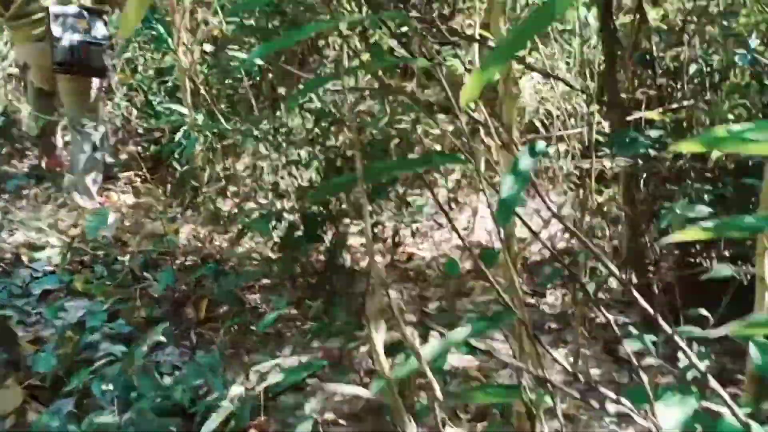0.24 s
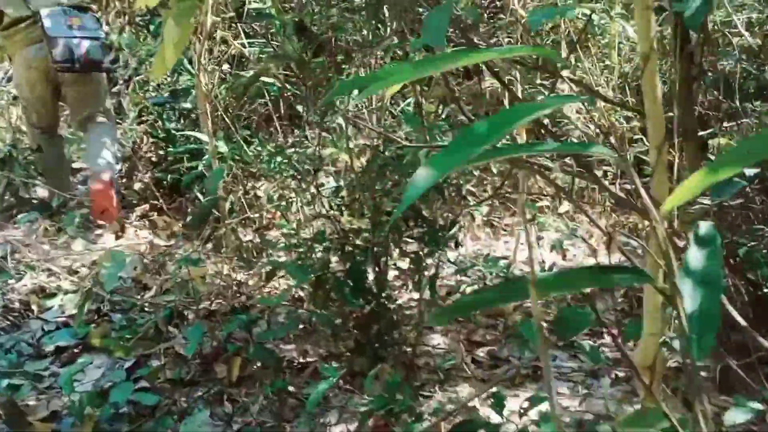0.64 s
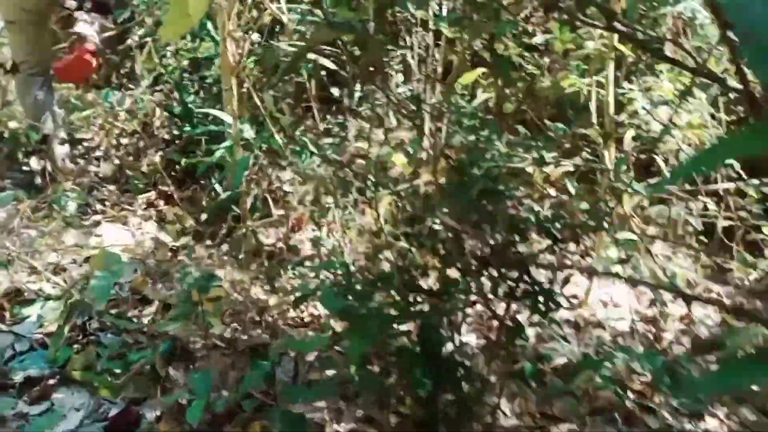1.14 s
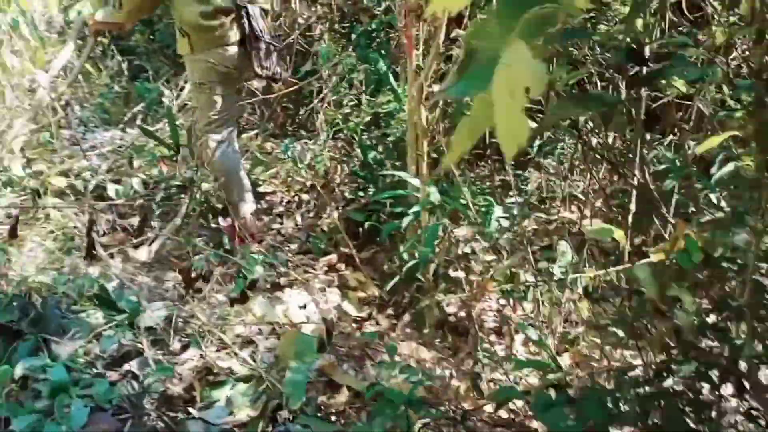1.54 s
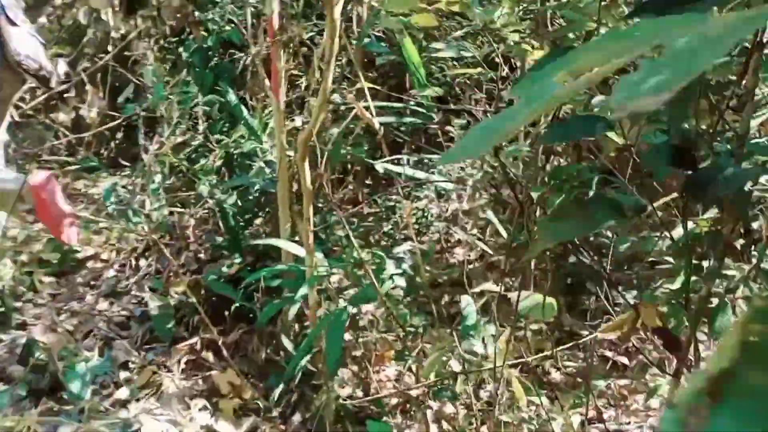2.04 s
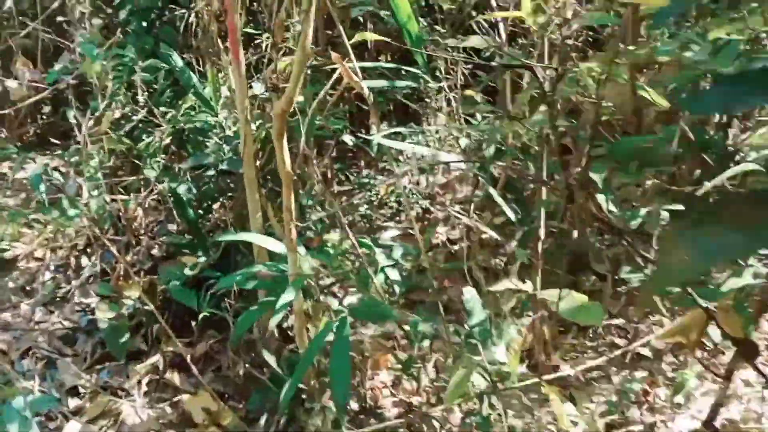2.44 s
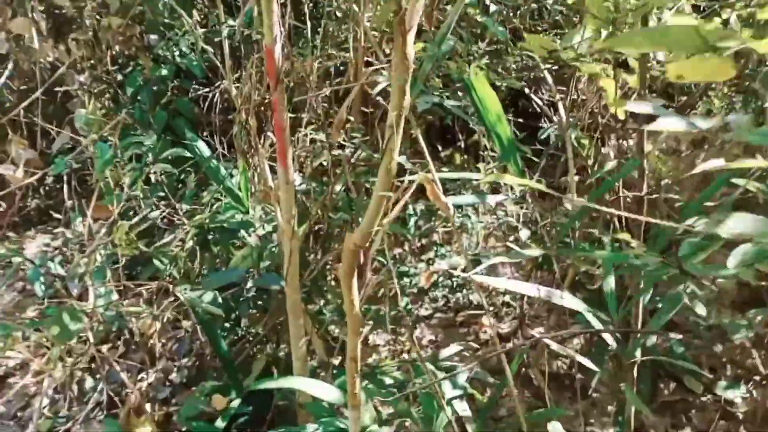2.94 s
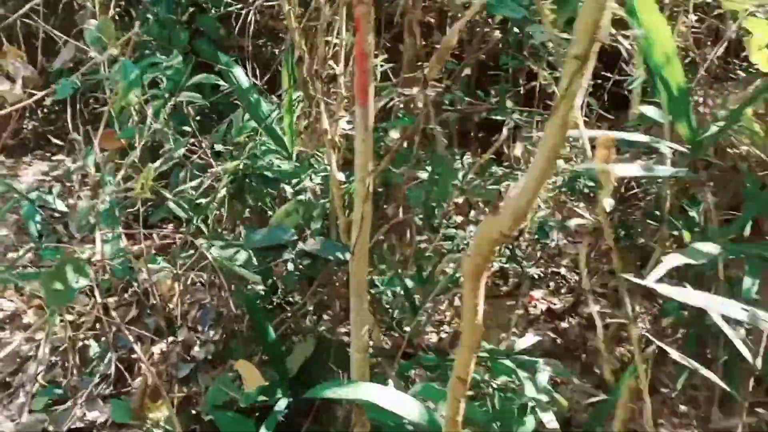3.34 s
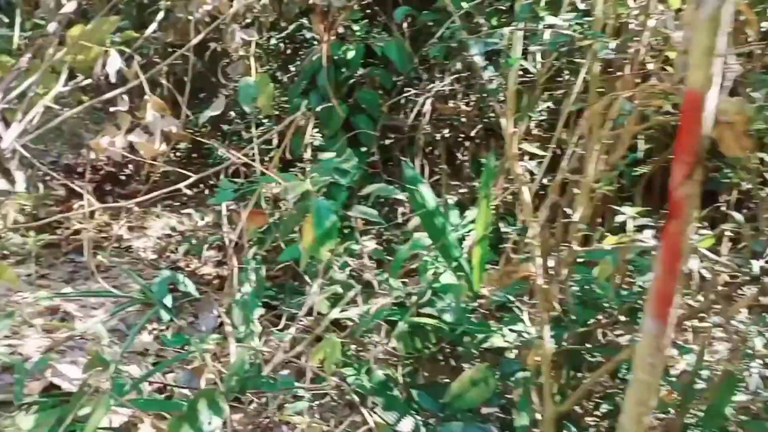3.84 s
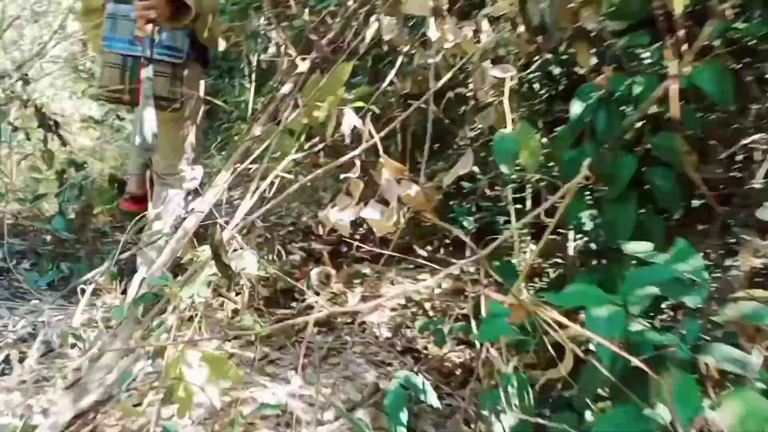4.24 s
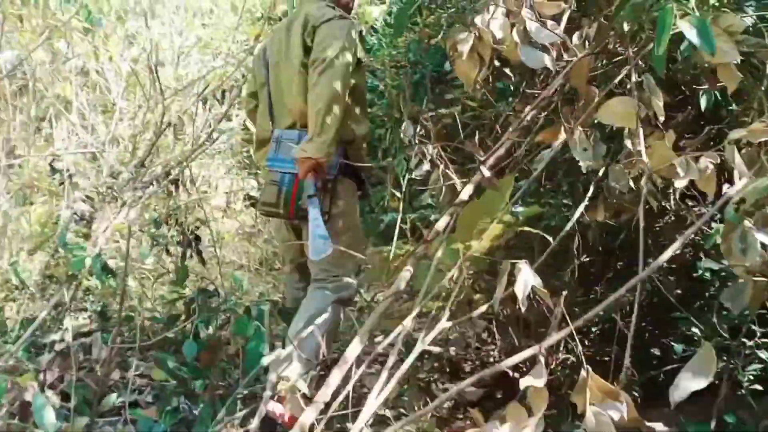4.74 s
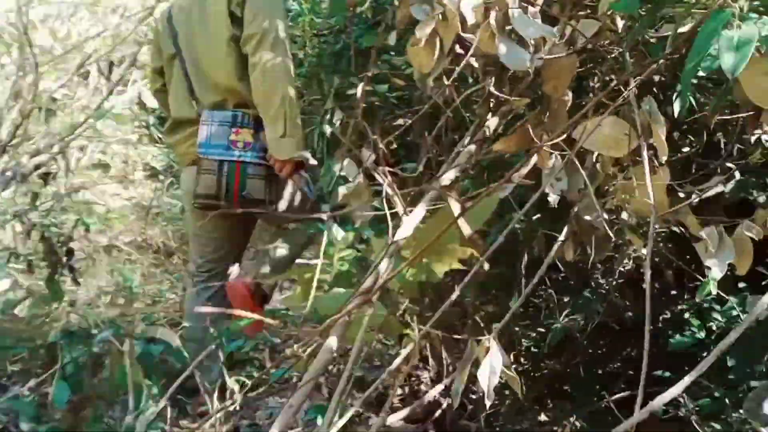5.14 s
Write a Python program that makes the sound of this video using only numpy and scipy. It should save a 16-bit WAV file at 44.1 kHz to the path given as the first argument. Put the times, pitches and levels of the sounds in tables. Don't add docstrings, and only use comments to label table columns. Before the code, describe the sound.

Close, dry outdoor sound of walking through brittle leaf litter in a forest, picked up by a small handheld microphone. From 0 to 1 second, light shuffling and scattered leaf ticks, with small snaps around 0.25, a twig near 0.5 and a crisp crackle at 1.0. From 1.1 to 2.1 it thins to soft foliage rustling and isolated ticks. A much heavier crunch bursts at about 2.3 to 2.45, followed by finer crackling; more crunches come at 3.0 and 3.3 to 3.4. A sharp single flake clicks at 3.76 in a quieter trickle of debris. Another firm crunch arrives at 4.1 to 4.2, then a lull, a hard twig snap at 4.7, and the fullest, brightest crunch around 4.8 to 4.9. Brushing leaves and small snaps continue to the end near 5.4. Faint dull heel thuds and low rumble sit beneath, with very short scattered reflections from the undergrowth.

```python
import sys
import numpy as np
from scipy import signal
from scipy.fft import rfft, irfft
from scipy.io import wavfile
from scipy.ndimage import uniform_filter1d

SR = 44100
rng = np.random.default_rng(int(sys.argv[2]) if len(sys.argv) > 2 else 0)


def pcm_store(signal):
    levels = np.round(np.clip(np.atleast_2d(signal), -1, 1) * 32767)
    wavfile.write(sys.argv[1], SR, levels.astype(np.int16).T)


def invert_db(level):
    return 10 ** (np.asarray(level, dtype=float) / 20)


N = 237213

# frequency_hz, density_db (per Hz)
LITTER_COLOUR = [(120, -72), (200, -19), (321, -16), (576, -11.5), (1010, -9.5), (2470, -1.5), (3020, -1.5),
                 (3600, -5.5), (4520, -11), (5940, -3), (7250, -0.5), (8300, -6), (9710, -14.5),
                 (12500, -5.5), (14300, -9.5), (15600, -11)]
SIZE_EDGES_HZ = [0, 1300, 4500, 9700, 30000]
# sole_db, rustle_db, brightness_share
LITTER_SIZES = [
    (-14, -12.5, 0),
    (-0.5, -1, 0.27),
    (-0.5, 1.5, 1),
    (-9.5, -7, 0.98),
]
# time_s, level_db, brightness_db
RUSTLE = [(0, -57, -7), (.2, -43, -6), (.55, -45, 0), (.68, -43.5, 1.5), (1.07, -40, -2.5), (1.42, -44, 2),
          (1.6, -41.5, -1), (1.9, -39, -1.5), (2.12, -46.5, -2), (2.6, -43.5, -2), (3.13, -42, -2),
          (3.5, -39.5, 2.5), (3.82, -44.5, 5.5), (4.01, -46.5, 6), (4.27, -48, -12), (4.66, -40.5, -2.5),
          (5.15, -38, 0), (5.38, -38.5, 0.5)]
# full_weight_s, rise_s, release_s, level_db,
# brightness_db
PRESSES = [(.07, 0.34, 0.22, -34, 1.5), (.236, 0.018, .06, -37, -2), (.275, 0.08, 0.032, -32.5, 0),
           (.347, 0.17, 0.18, -35.5, 0.5), (.8, 0.097, 0.27, -35, -4), (1.016, 0.042, 0.027, -31.5, -1),
           (1.33, 0.12, 0.098, -41, 1.5), (1.704, 0.012, 0.087, -32.5, -6.5),
           (1.828, 0.046, 0.082, -41.5, 6.5), (2.141, 0.0059, 0.073, -24, -8.5),
           (2.169, 0.033, 0.22, -29.5, 3), (2.345, 0.074, 0.21, -24.5, 0), (2.425, 0.13, 0.043, -28, 1),
           (2.93, 0.47, 0.13, -33, 3), (3.01, 0.088, 0.098, -29.5, -2.5), (3.177, 0.02, 0.32, -31, -3.5),
           (3.273, 0.061, 0.12, -24.5, -2.5), (3.37, 0.26, 0.19, -32.5, 3.5), (3.55, 0.036, 1, -33.5, -8),
           (4.034, 0.0064, 0.34, -31, -1.5), (4.165, 0.11, 0.09, -25, 0), (4.36, 0.24, 0.59, -36, 1.5),
           (4.851, 0.14, 0.15, -21, 0), (4.96, 0.036, 0.34, -34, 4),
           (0.134, 0.025, 0.022, -39.5, 5), (1.445, .006, 0.042, -35, -6), (2.0, 0.15, .08, -40.5, -1.5),
          (2.70, 0.05, 0.029, -41.5, 5), (3.06, 0.037, 0.053, -44, 12.5), (3.645, 0.061, .05, -44.5, 12),
          (4.11, 0.065, 0.041, -30.5, 0), (4.545, 0.017, 0.015, -36, 0), (4.625, .006, 0.037, -45, 6),
          (4.905, .04, 0.03, -31, 5), (5.09, 0.0081, 0.033, -30, -9), (5.176, 0.0071, 0.094, -35.5, 4.5),
          (1.36, .04, 0.023, -40.5, 3), (2.31, .012, .05, -37, 8), (4.765, 0.022, 0.016, -31, 0),
          (3.31, .05, .05, -33.5, 6), (5.245, 0.014, 0.043, -28.5, -2), (5.33, 0.069, 0.015, -42.5, 8)]
# fullest_s, rise_s, release_s, level_db
DUST_SIFTS = [
    (3.8, .25, .5, -43.5),
    (4.97, .08, .3, -45),
]
# frequency_hz, density_db (per Hz)
RUMBLE_COLOUR = [(15, -50), (25, -16), (38, -28), (87, -8), (380, -9), (640, -30), (990, -120)]

SOME_SNAPS = [
    (.3406, -20, 2100, .012),
    (.494, -26, 5900, .015),
    (1.5504, -21.5, 2710, .007),
    (1.6187, -21, 2350, .005),
    (3.7598, -13.5, 7500, .008),
    (3.7707, -17, 7830, .01),
    (1.4795, -31, 7000, .01),
]
TWIGS = [(0.3405, -26, 1250, 0.018), (0.358, -26.5, 1120, 0.034), (0.759, -29.5, 1120, 0.033),
         (1.4425, -34.5, 1260, 0.018), (1.549, -31.5, 1290, 0.029), (1.653, -35, 1000, 0.02),
         (2.136, -21, 1120, 0.016), (2.812, -31, 990, 0.035), (3.006, -22.5, 1320, 0.033),
         (3.36, -24, 1090, 0.023), (4.03, -30.5, 446, 0.014), (4.6225, -28, 990, 0.018),
         (4.732, -29, 1030, 0.028), (4.859, -25.5, 950, 0.018), (5.243, -37, 910, 0.042)]
LEAVES = [(0.1085, -22.5, 2930, 0.018), (0.23, -18, 2100, 0.014), (0.2369, -20, 2030, 0.049),
          (0.2526, -21, 2460, 0.027), (0.2697, -17.5, 2950, 0.03), (0.2764, -29, 3380, 0.018),
          (0.4936, -25, 1740, 0.026), (0.503, -24, 3220, 0.02), (0.781, -23, 2890, 0.018),
          (0.8086, -22, 2500, 0.018), (0.8899, -25, 2880, 0.024), (1.0084, -18.5, 2090, 0.015),
          (1.021, -29, 1770, 0.034), (1.1443, -28, 2390, 0.016), (1.257, -25.5, 2900, 0.018),
          (1.3174, -25, 3140, 0.02), (1.4432, -26, 2620, 0.018), (1.451, -30, 2180, 0.02),
          (1.501, -28.5, 2570, 0.037), (1.5208, -22.5, 3160, 0.027), (1.7, -28, 2800, 0.018),
          (1.8238, -21, 2990, 0.046), (1.865, -25, 2790, 0.018), (3.458, -22, 2040, 0.024),
          (3.69, -24.5, 1870, 0.029), (4.043, -19.5, 2480, 0.015), (4.367, -25, 2450, 0.019),
          (2.339, -7, 2820, 0.011), (2.371, -12.5, 2640, 0.024), (2.3798, -13, 2640, 0.015),
                  (2.3928, -10, 2750, 0.012), (2.4217, -18, 3150, 0.019), (2.8129, -21, 1730, 0.014),
                  (3.007, -12, 2170, 0.012), (3.0156, -17.5, 1900, 0.024), (3.189, -17, 2960, 0.023),
                  (3.2248, -19, 2320, 0.03), (3.362, -8.5, 3000, 0.02), (3.3736, -10, 2900, 0.0097),
                  (3.3876, -15, 2420, 0.009), (3.552, -23, 2700, 0.018), (4.118, -18, 2550, 0.026),
                  (4.174, -13.5, 2440, 0.014), (4.1875, -13.5, 2890, 0.023), (4.2514, -22.5, 2300, 0.015),
                  (4.6235, -30, 2486, 0.015), (4.7373, -23, 2270, 0.012), (3.0165, -25, 1300, 0.015),
                  (4.7965, -15, 2190, 0.012), (4.85, -19, 2930, 0.016), (4.8655, -12.5, 2850, 0.0079),
                  (4.882, -21, 2740, 0.016), (4.8987, -9.5, 2560, 0.014), (4.9623, -15.5, 2590, 0.019),
                  (5.1208, -22.5, 2540, 0.03), (5.2448, -26, 1760, 0.029), (5.2755, -26, 2380, 0.027)]
FLAKES = [(0.0156, -22, 6400, 0.029), (0.2289, -29, 6100, 0.013), (0.2757, -20, 5230, 0.013),
          (0.2834, -25, 7030, 0.016), (0.328, -26, 6300, 0.013), (0.386, -25, 7080, 0.013),
          (0.4644, -26, 7350, 0.013), (0.493, -25, 7160, 0.028), (0.817, -23, 6130, 0.013),
          (0.9277, -20, 6300, 0.013), (0.9862, -37, 7480, 0.013), (1.008, -15, 6550, 0.022),
          (1.013, -18, 6800, 0.013), (1.1814, -24, 6800, 0.013), (1.2544, -22, 7100, 0.013),
          (1.284, -26, 6500, 0.011), (1.3164, -21.5, 6930, 0.013), (1.343, -28, 6230, 0.013),
          (1.501, -26, 6630, 0.013), (1.699, -18.5, 6050, 0.014), (1.821, -16, 5840, 0.013),
          (1.83, -24, 6940, 0.012), (3.5904, -17, 6600, 0.019), (3.692, -21, 6940, 0.019),
          (3.7339, -30, 7500, 0.013), (3.852, -31, 6400, 0.013), (4.529, -26.5, 7210, 0.013),
          (4.545, -21, 6840, 0.013), (5.2415, -26, 7270, 0.013),
          (2.338, -10.5, 6540, 0.015), (2.356, -21, 7100, 0.013), (2.392, -14, 6200, 0.014),
                  (2.757, -20, 7200, 0.0063), (2.862, -24, 7000, 0.0081), (2.873, -16.5, 7040, 0.0085),
                  (2.939, -14, 6000, 0.014), (2.9966, -23, 6990, 0.013), (3.008, -14.5, 6080, 0.017),
                  (3.0294, -21, 6970, 0.013), (3.042, -18, 7500, 0.013), (3.058, -17, 7200, 0.013),
                  (3.273, -11.5, 7700, 0.014), (3.3616, -10.5, 7200, 0.021), (3.4564, -29, 6740, 0.014),
                  (3.466, -20, 7060, 0.013), (4.119, -12, 7100, 0.013), (4.623, -27, 7200, 0.013),
                  (4.8648, -9, 6500, 0.014), (4.9586, -18, 7360, 0.013)]
DUST = [(0.8764, -29, 11700, 0.012), (1.008, -14.5, 12400, 0.016), (1.1812, -31, 14000, 0.01),
        (1.2834, -33, 12700, 0.012), (1.3169, -29, 11500, 0.015), (2.7, -26, 10900, 0.012),
        (2.8624, -31, 13100, 0.012), (2.8724, -30, 12500, 0.012), (2.942, -23, 12200, 0.012),
        (3.2864, -23, 11500, 0.012), (3.3284, -22, 11000, 0.012), (3.457, -21, 11800, 0.012),
        (3.76, -33, 12500, 0.01), (3.7704, -32, 12500, 0.0065), (4.0826, -23, 12400, 0.012),
        (4.628, -22, 12800, 0.015), (4.865, -10.5, 12800, 0.012), (4.899, -10, 12500, 0.015),
        (4.9616, -22, 12200, 0.012), (5.2465, -26, 12700, 0.014)]
BURIED_STICKS = [(.225, -48, 606, .02), (.781, -36, 580, 0.022), (1.112, -42, 520, 0.048),
                 (1.562, -38, 620, .025), (1.697, -36.5, 409, .025), (2.301, -44, 447, .025),
                 (2.585, -43, 400, .025), (2.811, -34, 496, .02), (3.005, -30.5, 550, 0.036),
                 (3.225, -33.5, 590, 0.028), (3.255, -33, 673, .02), (3.288, -32, 670, 0.029),
                 (3.585, -33.5, 549, 0.025), (3.676, -40.5, 301, 0.025), (3.773, -43, 345, 0.027),
                 (4.116, -37, 676, .02), (4.769, -33.5, 387, 0.036), (4.81, -31, 495, 0.028),
                 (4.857, -28, 664, 0.017), (5.006, -43, 406, .025), (5.283, -43, 495, .025),
                 (.106, -29.5, 1210, .02), (0.251, -33, 1324, .02), (.877, -36, 1077, 0.026),
                 (1.3175, -39, 1077, .02), (1.8245, -34, 1249, .02), (2.149, -34, 1238, .02),
                 (2.434, -25.5, 1303, .02), (2.9155, -30, 1140, .02), (3.292, -26, 1303, 0.022),
                 (3.5525, -31, 1281, .02), (4.157, -25, 1230, 0.022), (4.5695, -37, 920, 0.018),
                 (4.679, -38, 1098, .02), (4.789, -34, 1227, .02)]
MORE_LEAVES = [(0.264, -21, 2500, 0.024), (.279, -23, 3300, .015), (.359, -29, 2200, 0.014),
               (.9755, -31, 2293, .015), (1.3023, -27, 2630, .015), (1.364, -29, 2540, 0.017),
               (2.3074, -29, 3030, .02), (2.3187, -20, 3630, .015), (2.35, -17, 2800, .015),
               (2.357, -16, 2700, .015), (2.4388, -18, 3130, .015), (2.7828, -20, 3020, .015),
               (2.7912, -25, 2283, 0.016), (2.9585, -24, 2390, .015), (3.2671, -15.5, 2050, 0.016),
               (3.2875, -20, 2300, .015), (3.3055, -20, 2400, .015), (3.3327, -20, 1880, 0.019),
               (3.3575, -16, 2900, .012), (3.5238, -24, 3155, .015), (3.8164, -29, 2121, .015),
               (3.8825, -31, 1960, .015), (3.895, -24, 2724, .015), (4.0952, -18, 2440, 0.017),
               (4.1144, -17, 2840, .012), (4.1584, -17, 2730, .015), (4.167, -18, 2500, .015),
               (4.208, -24, 2200, .015), (4.2433, -27, 3160, .012), (4.7633, -20, 1860, 0.035),
               (4.827, -11, 2500, 0.023), (4.936, -23, 2700, .012), (5.091, -21.5, 2350, 0.02),
               (5.1757, -30, 1800, 0.022), (5.242, -21.5, 3970, 0.03), (5.204, -35, 3400, .015)]
MORE_FLAKES = [(.265, -24, 5340, .015), (.281, -18, 5360, .013), (.945, -31, 6200, .013),
               (1.2457, -28, 7400, .013), (1.807, -20, 6660, 0.016), (1.826, -22, 6223, .013),
               (2.3337, -12.5, 7060, 0.014), (2.376, -17, 7192, .013), (2.782, -22.5, 5814, .013),
               (2.8138, -19, 7375, .013), (2.824, -26, 6331, .013), (2.942, -15, 6240, .015),
               (3.065, -20, 8300, .013), (3.232, -24, 6105, .013), (3.3133, -17, 6848, .013),
               (3.3278, -15, 7084, .013), (3.407, -17, 8000, .013), (3.451, -17, 7967, .013),
               (3.544, -22, 7332, .013), (3.647, -17, 8500, .013), (5.279, -18, 7041, 0.014),
               (5.329, -21, 7600, .013), (.0637, -30, 11563, .012), (2.3187, -31, 11143, .012),
               (2.43, -25, 11983, .012), (2.557, -35, 12737, .012), (2.8207, -27, 12941, .012),
               (2.907, -24, 12425, .012), (3.0095, -29, 12662, .012), (3.3747, -27, 11488, .012),
               (3.6472, -31, 11445, .012), (3.8285, -34, 13534, .012), (4.694, -28, 14029, .012),
               (4.9098, -11, 13943, .012)]

# start_s, peak_db, pitch_hz
THUDS = [(0.055, -48, 92), (.34, -49, 220), (.605, -52, 220), (.63, -48, 320), (1.01, -47, 260),
         (0.167, -51, 87), (0.77, -49, 230), (0.858, -39, 320), (1.342, -51, 98), (1.688, -59, 213),
         (1.706, -48, 334), (2.157, -40, 227), (2.813, -49, 230), (2.999, -45, 163), (3.46, -52, 200),
         (3.621, -54, 150), (3.66, -44, 520), (4.154, -40, 244), (4.179, -60, 112), (4.729, -47, 218),
         (4.861, -36, 310)]
# start_s, peak_db, pitch_hz, turns_to_peak (cycles)
RINGING_TWIGS = [
    (.4934, -23.5, 2050, 1.7),
    (0.4933, -18, 3050, 3.4),
    (1.4435, -29.5, 2510, 3.5),
    (4.623, -24, 1770, 1.1),
    (4.695, -26, 2300, 1.4),
    (4.713, -15.5, 1740, 1.5),
    (4.713, -22.5, 1080, 1.2),
    (5.273, -30, 1720, 3.0),
]


def evened(x):
    return x / np.sqrt(np.mean(x ** 2) + 1e-20)


def read(points, hz):
    f, value = np.transpose(points)
    return np.interp(np.log(hz + 1), np.log(f + 1), value)


def causal(points, size=4096):
    gain_db = np.maximum(read(points, abs(np.fft.fftfreq(size, 1 / SR))), -100)
    log_gain = np.log(invert_db(gain_db))
    return np.fft.ifft(np.exp(np.conj(signal.hilbert(log_gain)))).real[:size // 2]


def wander(seconds):
    size = max(int(seconds * SR), 1)
    once = uniform_filter1d(rng.standard_normal(N), size)
    return evened(uniform_filter1d(once, size))


def contact_power(t, s, rise, release, db):
    away = abs(t - s) / np.maximum(np.where(t < s, rise, release), .002)
    return invert_db(db - 22.5 * away ** 1.316) ** 2


def pressure_db():
    t = np.arange(0, N + 64, 64) / SR
    sole_db, rustle_db, share = np.transpose(LITTER_SIZES)[:, :, None]
    s, db, bright_db = np.transpose(RUSTLE)
    power = invert_db(np.interp(t, s, db) + rustle_db + share * np.interp(t, s, bright_db)) ** 2
    for s, rise, release, db, bright_db in PRESSES:
        power = power + contact_power(t, s, rise, release, db + sole_db + share * bright_db)
    for s, rise, release, db in DUST_SIFTS:
        power[-1] += contact_power(t, s, rise, release, db)
    return [np.interp(np.arange(N) / SR, t, 10 * np.log10(row)) for row in power]


def crackle(per_s, spread_db, clump_db, hiss, count=48):
    t, out = np.arange(1024) / SR, np.zeros(N)
    busy = invert_db(clump_db * wander(0.0047) + 1.1 * wander(.02))
    chance = rng.random((count, N))
    size = invert_db(spread_db * np.minimum(rng.exponential(1, N), 3.8))
    for k, hz in enumerate(np.geomspace(300, 15000, count)):
        cycles = rng.uniform(1.0, 5.1)
        shard = np.sin(2 * np.pi * hz * t) * np.exp(-t * hz / cycles) * np.minimum(t * hz, 1)
        shard_gain = np.sqrt(hz) / np.linalg.norm(shard)
        rate = per_s * (hz / 2000) ** .6 * busy
        train = (chance[k] < rate / SR) * np.roll(size, 997 * k) / np.sqrt(rate.mean())
        out += signal.oaconvolve(train, shard * shard_gain)[:N]
    wide = (rng.random(N) < 500 * busy / SR) * size * rng.choice([-1., 1.], N)
    return evened(out) + 0.49 * evened(wide) + hiss * np.sqrt(busy) * rng.standard_normal(N)


def shifting(x, patchy_db=1.5):
    z = signal.stft(x, nperseg=256)[2]
    across_pitch = uniform_filter1d(rng.standard_normal(z.shape), size=5, axis=0)
    patches = uniform_filter1d(across_pitch, size=14, axis=1)
    return signal.istft(z * invert_db(patchy_db * evened(patches)), nperseg=256)[1][:N]


def litter(levels_db):
    hiss = 1.6 * invert_db(.15 * (levels_db[1] - levels_db[1].mean()))
    cracks = crackle(per_s=150, spread_db=3.7, clump_db=1.5, hiss=hiss)
    source = shifting(cracks / np.sqrt(1.2 + hiss ** 2))
    z = rfft(signal.oaconvolve(source, causal(LITTER_COLOUR))[:N])
    hz = np.fft.rfftfreq(N, 1 / SR)
    below = [1 / (1 + (hz / (edge + 1)) ** 12) for edge in SIZE_EDGES_HZ]
    out = np.zeros(N)
    for k, db in enumerate(levels_db):
        out += invert_db(db) * evened(irfft(z * (below[k + 1] - below[k]), N))
    return out


def rumble(leaves_db):
    step_db = 0.13 * (leaves_db - leaves_db.mean())
    gain = invert_db(read(RUMBLE_COLOUR, np.fft.rfftfreq(N, 1 / SR)))
    noise = irfft(rfft(rng.standard_normal(N)) * gain, N)
    return invert_db(-60) * evened(noise) * invert_db(step_db + 0.39 * wander(0.036))


def snaps(wide_db=-15):
    t, out = np.arange(2048) / SR, np.zeros(N + 2048)
    colour = causal(LITTER_COLOUR)
    rows = SOME_SNAPS + TWIGS + LEAVES + FLAKES + DUST
    rows = rows + BURIED_STICKS + MORE_LEAVES + MORE_FLAKES
    for (s, db, hz, t60), splinters in zip(rows, rng.standard_normal((len(rows), len(t)))):
        turns = np.sqrt(hz / 780) if hz < SIZE_EDGES_HZ[2] else 2.2
        burst = splinters * invert_db(-60 * t / max(t60, .004)) * np.minimum(t / .0004, 1)
        burst[8] = 5.5
        mode = np.sin(2 * np.pi * hz * t) * np.exp(-t * hz / max(turns, .4))
        ring = signal.fftconvolve(burst, mode)[:len(t)]
        ring = signal.lfilter(*signal.butter(2, 0.55 * hz, "high", fs=SR), ring)
        wide = signal.fftconvolve(burst, colour)[:len(t)]
        sound = ring / abs(ring).max() + invert_db(wide_db) * wide / abs(wide).max()
        out[round(s * SR):][:len(t)] += invert_db(db) * sound
    return out[:N]


def swelling_tone(t, hz, turns):
    decay = t * hz / turns
    return np.sin(2 * np.pi * hz * t) * decay * np.exp(1 - decay)


def thuds(turns=0.85):
    t, out = np.arange(4096) / SR, np.zeros(N + 4096)
    for s, db, hz in THUDS:
        out[round(s * SR):][:len(t)] += invert_db(db) * swelling_tone(t, hz, turns)
    return out[:N]


def ringing():
    t, out = np.arange(2048) / SR, np.zeros(N + 2048)
    for s, db, hz, turns in RINGING_TWIGS:
        out[round(s * SR):][:len(t)] += invert_db(db) * swelling_tone(t, hz, turns)
    return out[:N]


def undergrowth(x, t60=0.052):
    at = np.arange(60, 6000, 20) + rng.integers(0, 20, 297)
    taps = np.zeros(6100)
    taps[at] = rng.choice([-1., 1.], len(at)) * invert_db(-60 * at / SR / t60)
    return signal.oaconvolve(x, taps / np.linalg.norm(taps))[:N]


def scene():
    levels_db = pressure_db()
    near = invert_db(-0.95) * litter(levels_db) + snaps() + ringing()
    scatter = invert_db(-12.5) * undergrowth(near)
    return (near + scatter + thuds() + rumble(levels_db[1]))[None]


def top_cut(x):
    return signal.sosfilt(signal.butter(12, 16830, fs=SR, output="sos"), x)


def record(dry):
    ceiling, edge_hz = .75, 15680
    rounded = ceiling * np.tanh(dry / ceiling)
    edge = signal.firwin(1535, edge_hz, window=("kaiser", 7), fs=SR)
    return top_cut(signal.oaconvolve(rounded, edge[None], "same"))


dry = scene()
out = record(dry)
pcm_store(out)
```